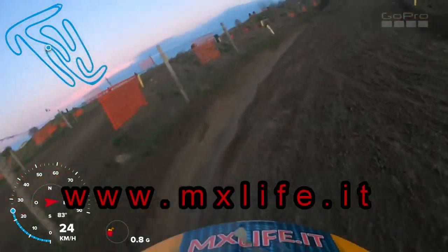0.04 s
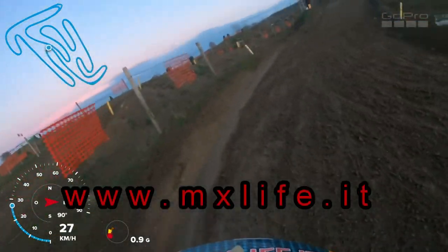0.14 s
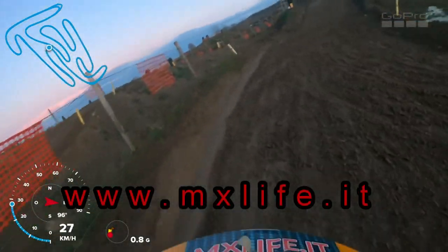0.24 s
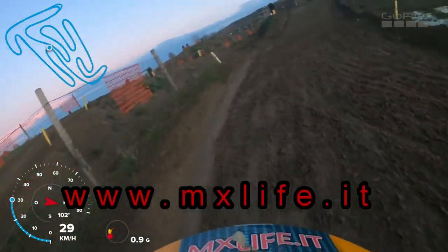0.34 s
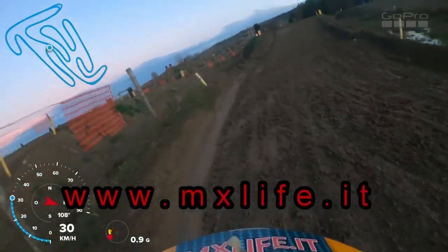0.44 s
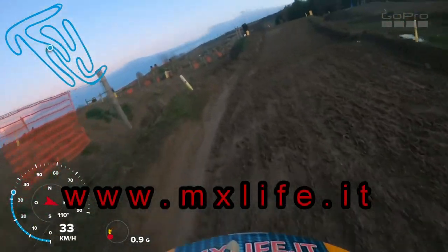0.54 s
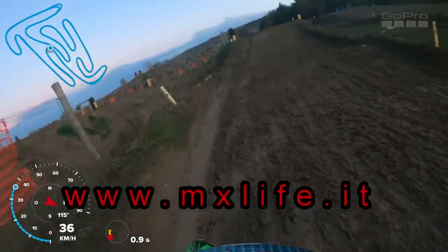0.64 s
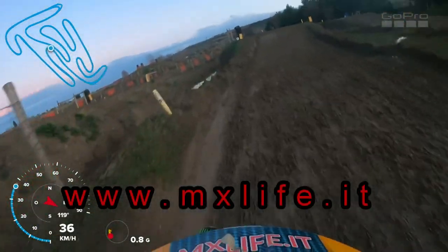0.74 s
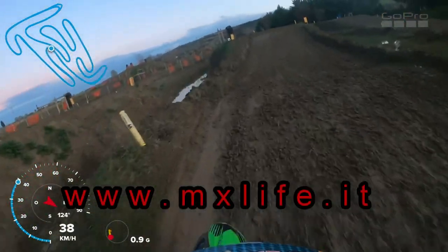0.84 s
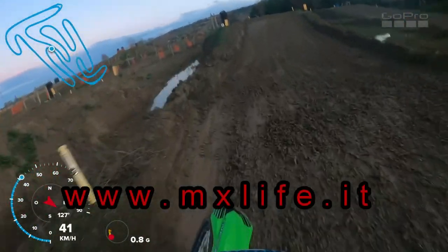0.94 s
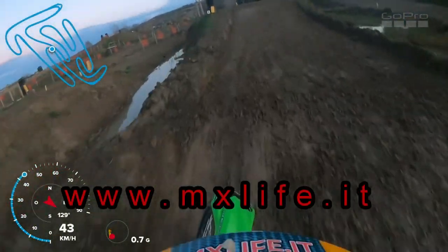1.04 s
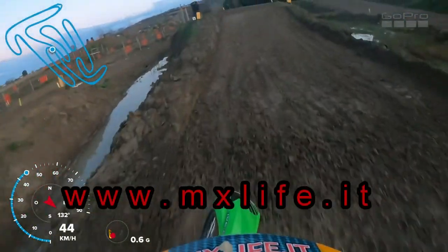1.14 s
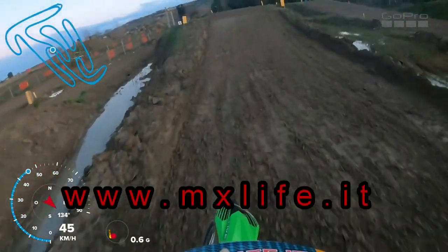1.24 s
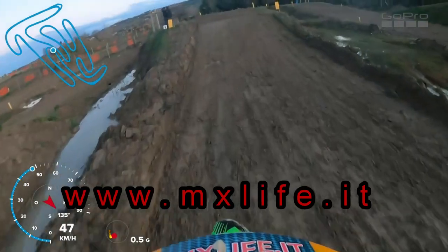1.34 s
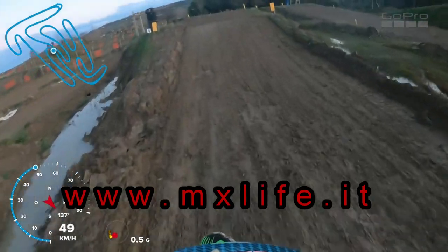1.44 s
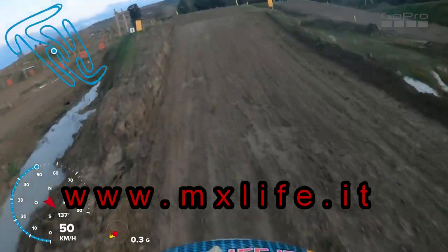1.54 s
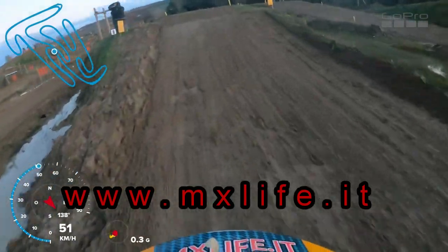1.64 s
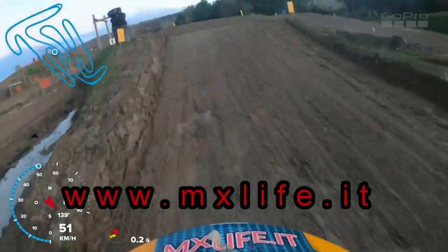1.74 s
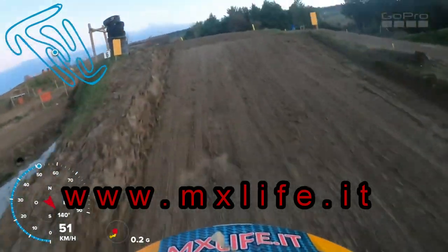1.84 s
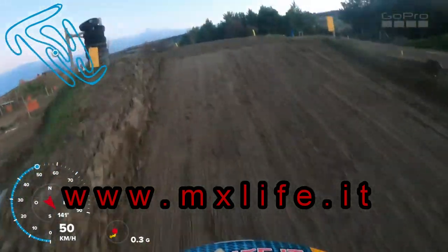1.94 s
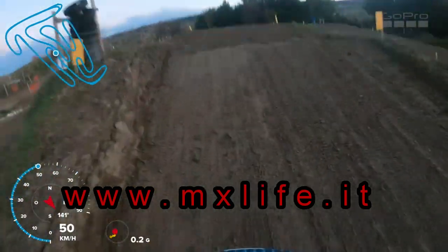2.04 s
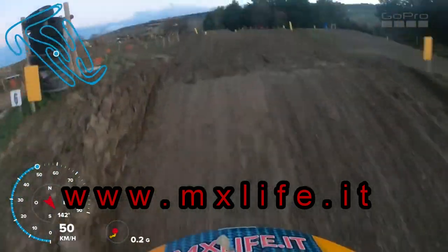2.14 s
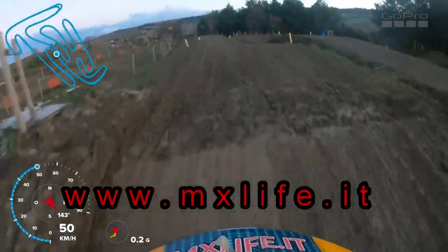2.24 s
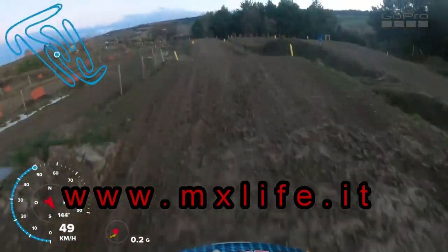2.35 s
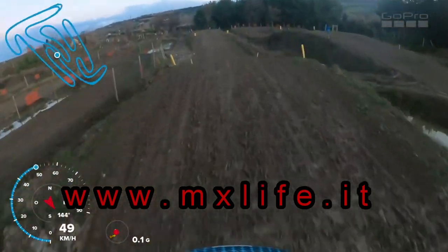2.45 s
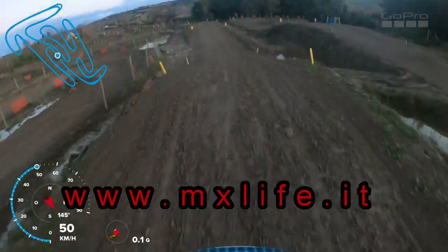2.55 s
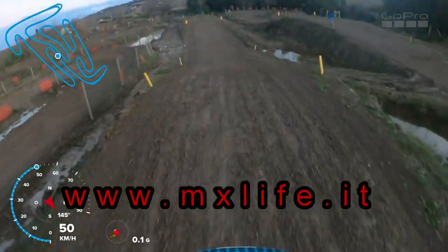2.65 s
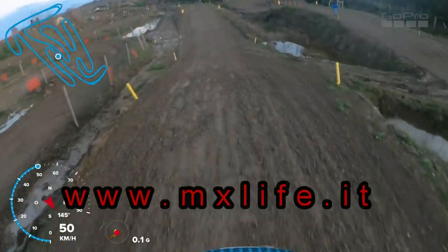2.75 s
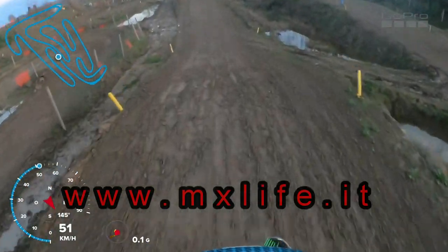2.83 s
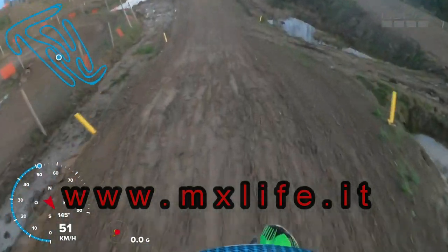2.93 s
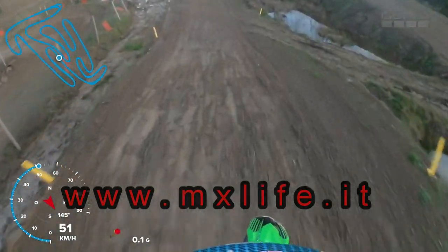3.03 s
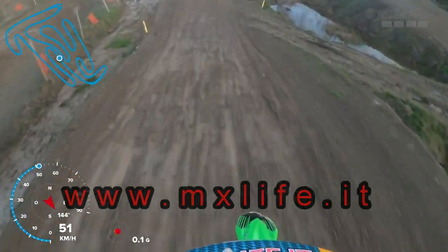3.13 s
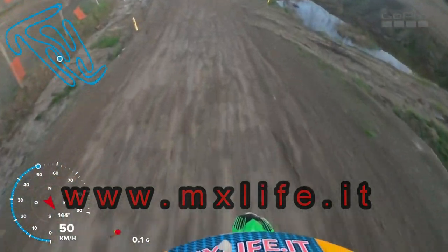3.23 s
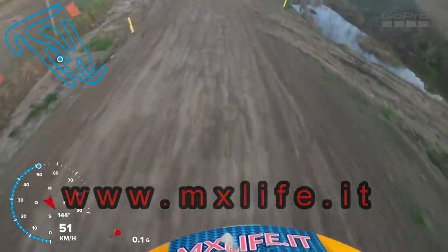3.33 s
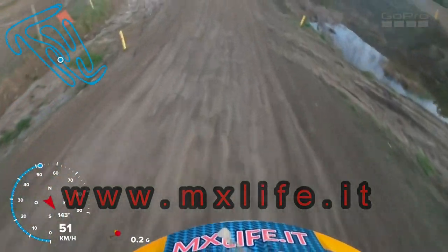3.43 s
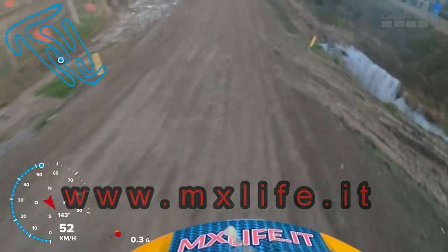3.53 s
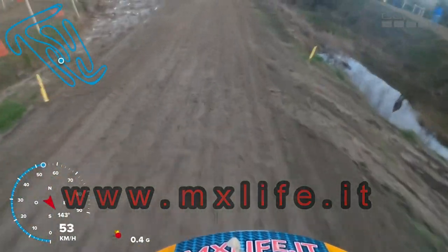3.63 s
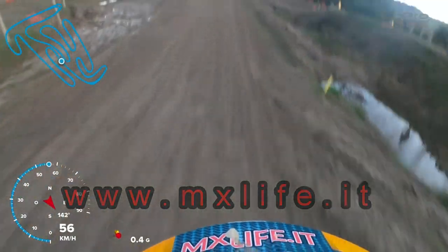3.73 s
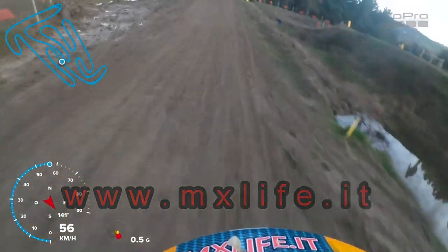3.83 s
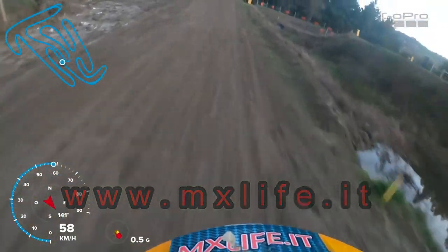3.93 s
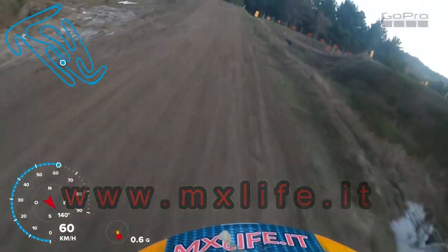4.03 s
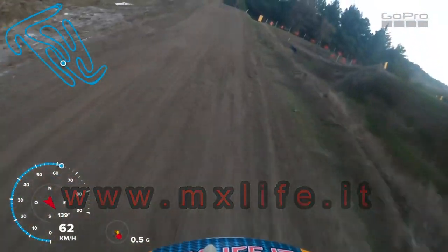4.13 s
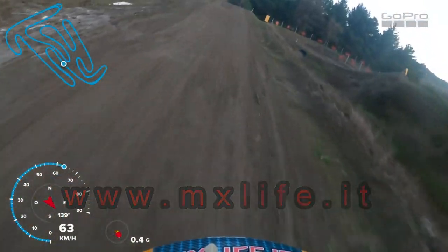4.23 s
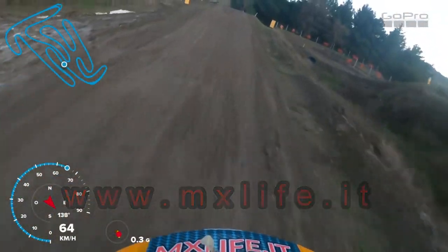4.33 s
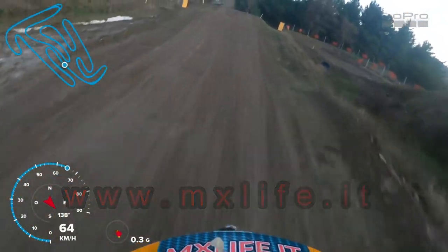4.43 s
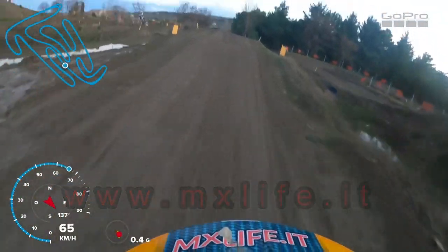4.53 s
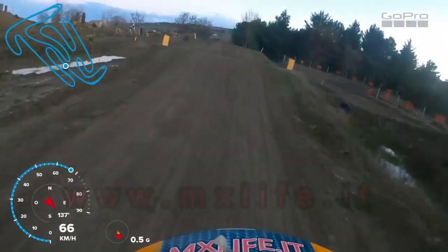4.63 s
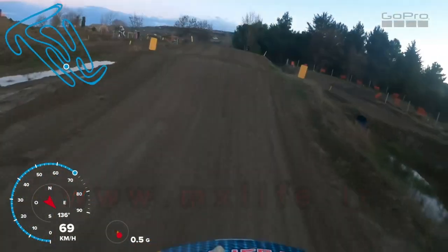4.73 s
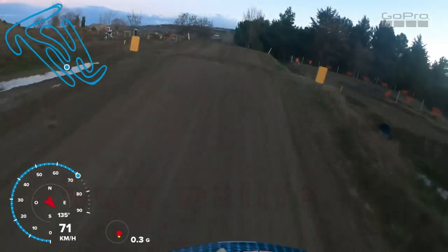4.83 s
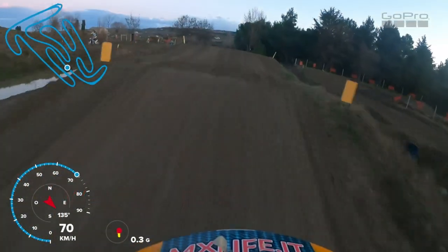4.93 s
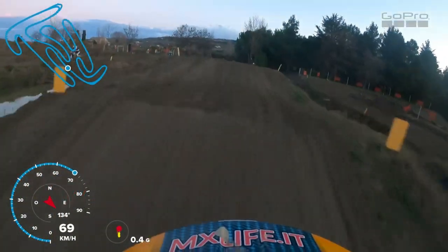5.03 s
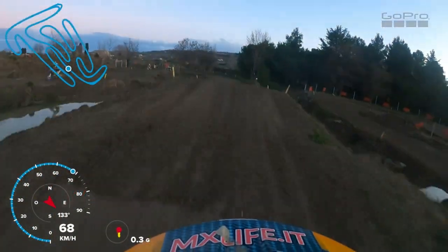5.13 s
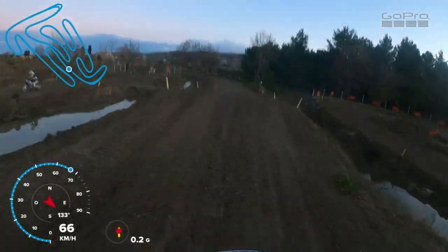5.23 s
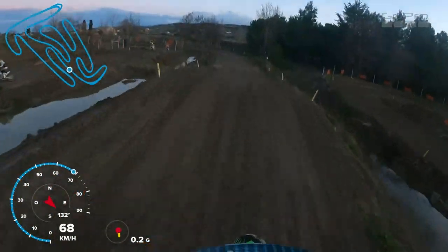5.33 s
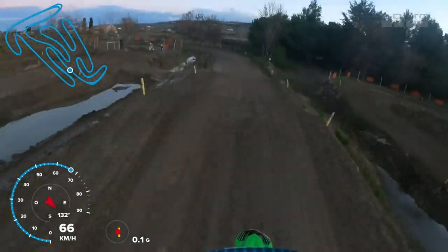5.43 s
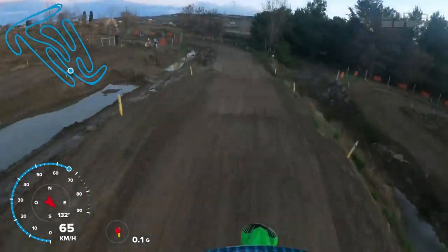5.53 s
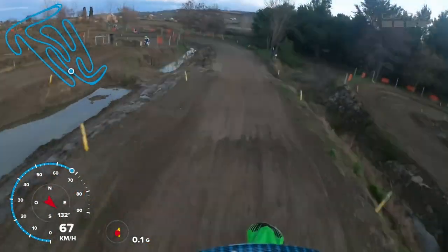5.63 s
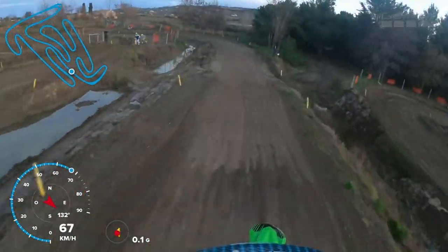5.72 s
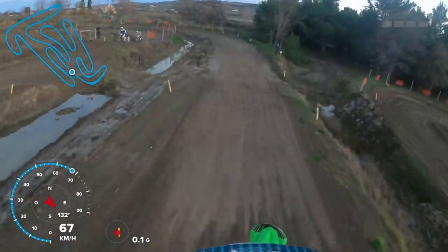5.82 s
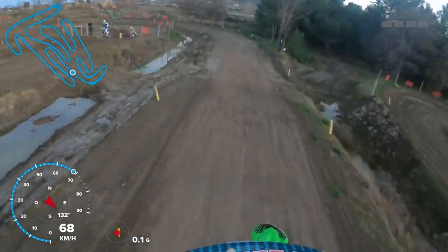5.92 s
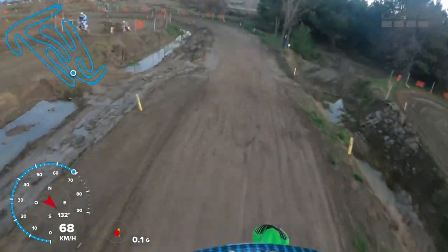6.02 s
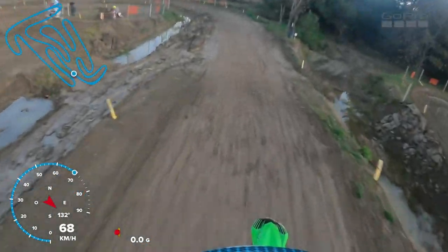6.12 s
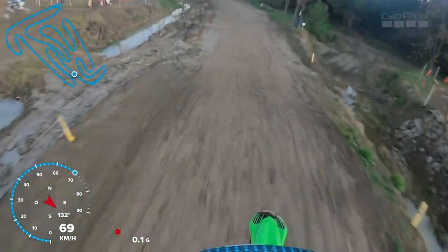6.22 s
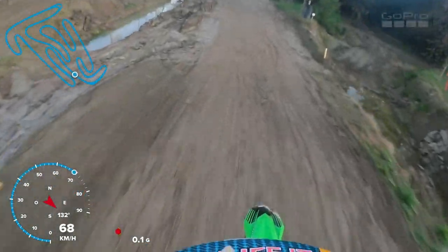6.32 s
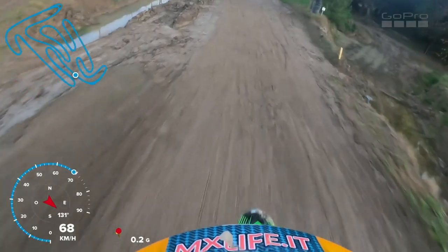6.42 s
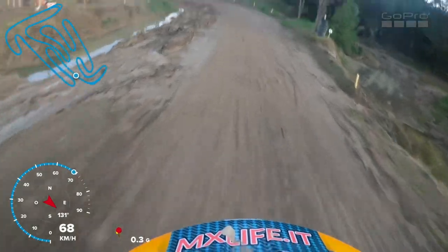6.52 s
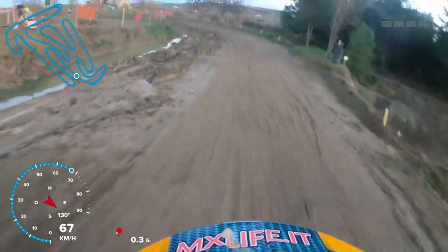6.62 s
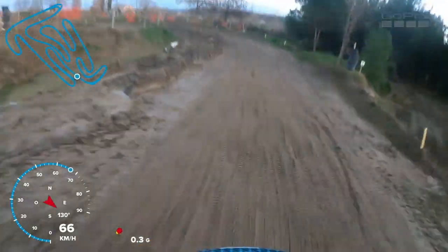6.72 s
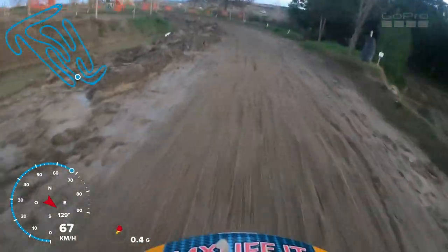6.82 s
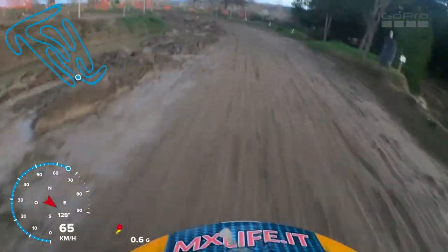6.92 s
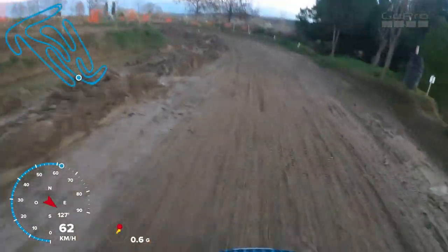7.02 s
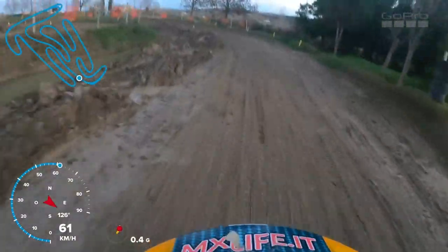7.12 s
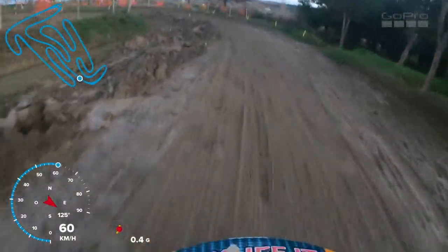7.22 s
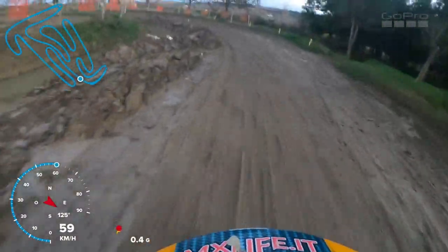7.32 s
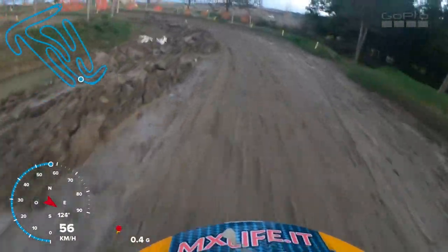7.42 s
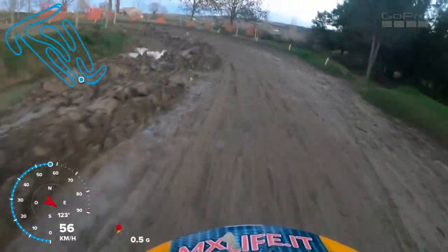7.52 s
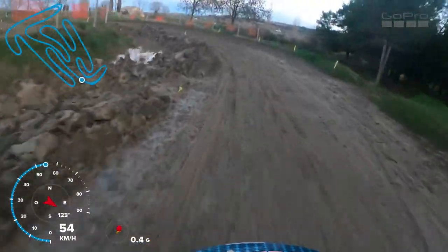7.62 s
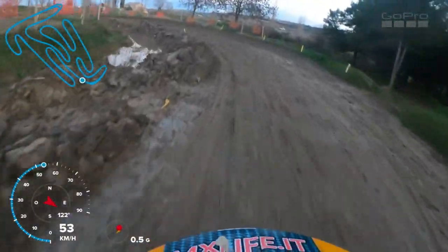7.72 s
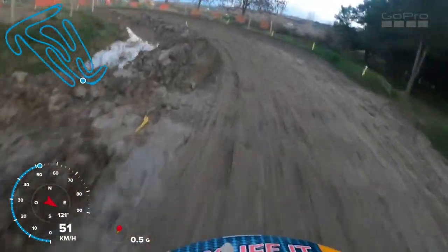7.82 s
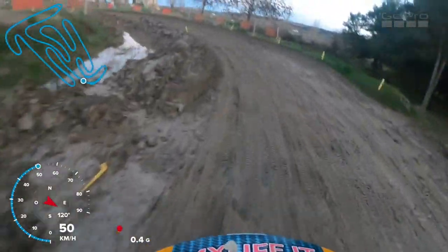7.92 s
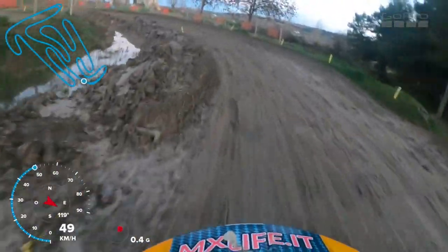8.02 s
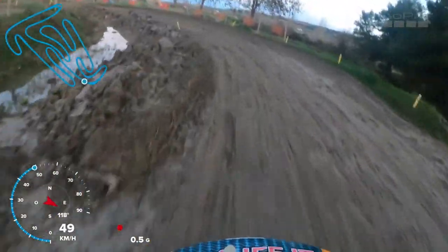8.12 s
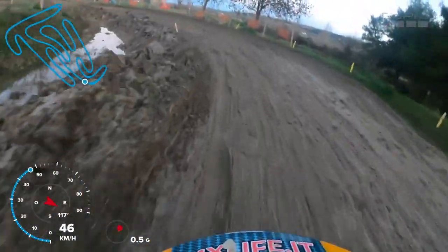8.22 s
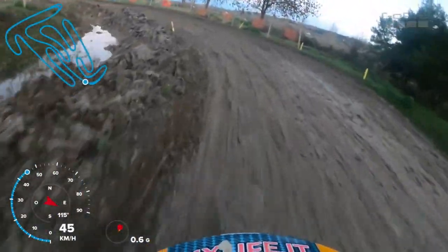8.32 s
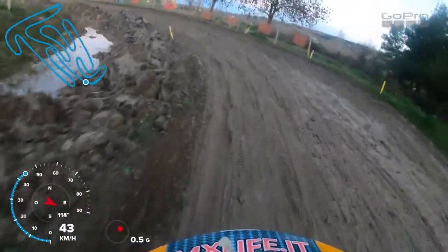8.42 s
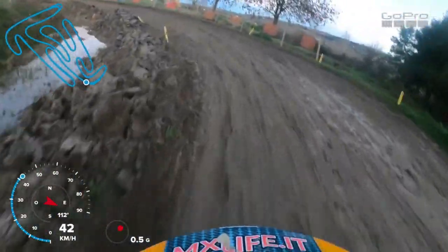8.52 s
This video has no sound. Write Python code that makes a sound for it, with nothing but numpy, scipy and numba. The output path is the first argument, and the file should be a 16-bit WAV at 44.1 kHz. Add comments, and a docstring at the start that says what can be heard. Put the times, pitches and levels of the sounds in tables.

```python
"""A single-cylinder four-stroke motocross bike on a dirt track, heard from inside the rider's helmet.
It pulls out of a corner, takes two jumps with a blip of the throttle in the air, then coasts lumpily into a bend.
Each engine cycle sends out pulses that ring the airbox, thud in the silencer and crack from the exhaust.
Clicks timed to the engine also shake the gears; filtered noise makes the chain and tyre rush, wind and hum.
Flying grit ticks on the helmet, and one jolt shakes it."""
import sys
import numpy as np
from scipy import signal
from scipy.fft import rfft, irfft
from scipy.io import wavfile
from scipy.ndimage import uniform_filter1d
from numba import njit

SR = 44100
rng = np.random.default_rng(int(sys.argv[2]) if len(sys.argv) > 2 else 0)


def bounce(signal):
    """Save signal as a 16-bit WAV file at the path given by the first command-line argument."""
    frames = np.transpose(np.atleast_2d(signal))
    limited = np.clip(frames, -1, 1)
    pcm = np.round(limited * 32767).astype(np.int16)
    wavfile.write(sys.argv[1], SR, pcm)


N = 377496  # length in samples


def undb(db):
    """Turn decibels into a gain to multiply by."""
    return 10 ** (np.asarray(db) / 20)


def together(*levels_db):
    """Level in dB of several unrelated sounds at once: their powers add."""
    return 20 * np.log10(np.sqrt(sum(undb(db) ** 2 for db in levels_db)))


def curves(table):
    """Join the points of each column by straight lines in time."""
    t, *columns = np.transpose(table)
    return [np.interp(np.arange(N) / SR, t, column) for column in columns]


def noise():
    """White noise: all pitches at once."""
    return rng.standard_normal(N)


def walk(rate):
    """Random wander: straight lines between random values, `rate` values a second."""
    knots = rng.standard_normal(2048)
    return np.interp(np.arange(N) / SR * rate, np.arange(len(knots)), knots)


def steady(x, size=3500):
    """Even out the level to 1 over a few engine cycles, leaving the single beats as they are."""
    power = uniform_filter1d(uniform_filter1d(x * x, size), size)
    return x / np.sqrt(np.maximum(power, 1e-14))


def colour(x, points, size=8192):
    """Filter to an outline of (f/Hz, level/dB) that acts only after each pulse, as a real body rings."""
    f, db = np.transpose(points)
    bins_hz = np.maximum(np.fft.rfftfreq(size, 1 / SR), 1)
    outline_db = np.interp(np.log(bins_hz), np.log(f), db)
    # folding the cepstrum forward in time gives the minimum-phase filter
    cepstrum = irfft(np.log(undb(outline_db)))
    cepstrum[1:size // 2] *= 2
    cepstrum[size // 2 + 1:] = 0
    response = irfft(np.exp(rfft(cepstrum)))
    return signal.oaconvolve(x, response)[:N]


def resonance(x, hz, width_hz):
    """Ring at one fixed pitch; a narrower width rings longer."""
    return signal.lfilter(*signal.iirpeak(hz, hz / width_hz, fs=SR), x)


@njit
def sweep(x, hz, width_hz):
    """Ring at a pitch that moves: a state-variable band-pass filter, one sample at a time."""
    y, band, low = np.empty(len(x)), 0., 0.
    for i in range(len(x)):
        g = np.tan(np.pi * hz[i] / SR)
        k = width_hz[i] / hz[i]
        v = (band + g * (x[i] - low)) / (1 + g * (g + k))
        band = 2 * v - band
        low = low + 2 * g * v
        y[i] = k * v
    return y


def clicks(times, sizes):
    """Put one click at each time, shared between the two nearest samples."""
    at = np.clip(times * SR, 0, N - 2)
    sizes = sizes * (at < N - 2)  # drop clicks past the end
    i = at.astype(int)
    return np.bincount(i, sizes * (1 - at + i), N) + np.bincount(i + 1, sizes * (at - i), N)


def puffs(kicks, decay_s):
    """Each kick starts a burst of noise that dies away, like turbulent gas."""
    envelope = signal.lfilter([1], [1, -np.exp(-1 / (decay_s * SR))], kicks)
    return envelope * noise()


# rush level at which the helmet's boom and whistle have their stated levels
SINGING_RUSH_DB = -55
# colour of the wind: f/Hz, relative level/dB
WIND_COLOUR = [(12, -15.5), (30, -12.5), (60, -13), (120, -19), (300, -21.5), (900, -50), (3000, -100)]


def wind(rush_db, rumble_db=15.0, boom_db=-41.0, boom_growth=1.0):
    """Eddies of air buffet the microphone as a low rumble and make the helmet's shell boom at 77 Hz."""
    buffet_db = 3.8
    rumble = steady(colour(noise(), WIND_COLOUR))
    rumble = rumble * undb(rush_db + rumble_db + buffet_db * walk(rate=22))
    shell = resonance(resonance(noise(), hz=77.0, width_hz=22), hz=77.0, width_hz=22)
    return rumble + steady(shell) * undb(boom_db + boom_growth * (rush_db - SINGING_RUSH_DB))


# colour of a gust: f/Hz, relative level/dB
GUST_COLOUR = [(12, -12.5), (35, 0.5), (70, -16), (130, -14.5), (400, -34.5), (1500, -70.5), (6000, -130)]
# gusts on bumps, landings and braking: middle t/s, half length t/s, rumble level/dB
GUST_EVENTS = [(0.174, 0.093, -40), (0.696, 0.054, -36.5), (0.84, 0.029, -37), (1.969, 0.078, -32.5),
               (2.11, 0.03, -36), (2.407, .035, -40), (3.723, 0.077, -35), (4.253, 0.036, -35),
               (4.869, 0.062, -36), (6.585, 0.031, -40), (6.73, 0.05, -27), (6.931, 0.039, -46),
               (7.107, 0.058, -39), (7.848, 0.028, -35), (8.248, 0.22, -40)]


def gusts(t):
    """Short, deep gusts over the helmet: low noise swelling and fading in a bell curve."""
    swell = sum(undb(db) * np.exp(-.5 * ((t - s) / half_s) ** 2) for s, half_s, db in GUST_EVENTS)
    return steady(colour(noise(), GUST_COLOUR), size=2000) * swell


# the helmet's hum, before it wavers: t/s, level/dB
HUM_LEVEL = [(0, -57), (1.65, -52.5), (1.95, -46), (2.4, -56.5), (3.0, -58.5), (3.9, -48), (4.9, -42),
             (5.5, -52), (5.85, -50.5), (6.0, -42), (6.45, -42.5), (6.8, -50.5), (7.4, -49), (8.56, -54.5)]


def hum(hz=627.5, width_hz=37.0, drift=0.028, waver_db=2.5):
    """Air blows across a small cavity of the helmet, which picks one wavering note out of the noise."""
    level_db, = curves(HUM_LEVEL)
    centre_hz = hz * (1 + drift * walk(rate=9))
    width = np.full(N, 1. * width_hz)
    note = sweep(sweep(noise(), centre_hz, width), centre_hz, width)
    return steady(note) * undb(level_db + waver_db * walk(rate=18))


def whistle(rush_db, level_db=-58, growth=1.58):
    """Fast air sizzles at an edge of the helmet, with fine hiss above; it grows faster than the rush."""
    waver_db, spray_db = .7, -18.0
    edge = resonance(resonance(noise(), hz=5270, width_hz=820), hz=5270, width_hz=820)
    spray = undb(spray_db) * steady(resonance(noise(), hz=8000, width_hz=1700))
    whistle_db = level_db + growth * (rush_db - SINGING_RUSH_DB)
    return (steady(edge) + spray) * undb(whistle_db + waver_db * walk(rate=9.9))


def jolt(t, at_s=1.952, envelope_db=-22, hz=22.0, half_s=0.044):
    """The bike slams through a dip and the helmet swings slowly a few times against the microphone."""
    since = t - at_s
    envelope = undb(envelope_db) * np.exp(-.5 * (since / half_s) ** 2)
    return envelope * np.sin(2 * np.pi * hz * since)


# grit hitting the helmet: t/s, click level/dB before the trim
GRIT_HITS = [(0.8246, -57), (1.1542, -69), (1.1863, -60), (1.8243, -67), (5.0283, -57), (5.112, -65)]


def grit(trim_db=2.0):
    """Flying dirt ticks on the helmet: single clicks through a wide, bright resonance."""
    s, db = np.transpose(GRIT_HITS)
    return resonance(clicks(s, undb(db + trim_db)), hz=10000, width_hz=9000)


# engine speed while the rear wheel grips: t/s, firing rate f/Hz
IN_GEAR_REVS = [(0, 40.05), (.11, 46.22), (.2, 48.45), (.5, 50.8), (.95, 58.47), (1.02, 64.75),
                (1.45, 67.2), (1.63, 61.92), (1.86, 68.84), (1.9, 64.1), (1.95, 72.67), (2.02, 70.7),
                (2.5, 74.35), (3.55, 63.58), (3.63, 63.54), (3.98, 73.67), (4.5, 77.86), (4.92, 80.33),
                (5.0, 84.3), (5.26, 85.23), (6.6, 61.07), (6.95, 74.53), (7.22, 55.26), (7.42, 45.9),
                (7.59, 52.18), (8.0, 51.65), (8.3, 54.9), (8.56, 51.1)]
# the rear wheel spins up on loose dirt, then bites: peak t/s, extra firing rate f/Hz, spin-up t/s
WHEEL_SLIPS = [(0.419, 1.79, 0.067), (0.581, 6.7, 0.067), (0.734, 7.7, 0.09), (0.884, 6.9, 0.067),
               (1.375, 13.1, 0.092), (1.814, 24.5, 0.16), (2.08, 12, 0.054), (2.217, 19.7, 0.086),
               (3.69, 6.6, 0.083), (3.89, 2.74, 0.13), (4.09, 3.16, 0.1043), (4.271, 2.13, 0.061),
               (4.605, 10.3, 0.11), (6.68, 3.3, 0.052), (7.26, 4.86, 0.04), (7.36, 3.2, 0.04)]
# jumps: take-off t/s, firing rate at take-off f/Hz, sag time constant t/s, blip start t/s,
# blip top t/s, firing rate at the top f/Hz, landing t/s
JUMP_EVENTS = [(2.55, 85.02, 1.34, 3.265, 3.475, 91.34, 3.461),
               (5.38, 90.2, 1.46, 6.16, 6.37, 82.58, 6.545)]
BITE_S = .07  # time the tyre takes to find its grip again, or to lose it at take-off


def revs(t):
    """Firing rate: tied to the ground, flaring with wheelspin; in the air it sags until the rider blips."""
    hz, = curves(IN_GEAR_REVS)
    for s, extra_hz, spin_s in WHEEL_SLIPS:
        hz = hz + extra_hz * np.interp(t, [s - spin_s, s, s + BITE_S], [0, 1, 0])
    for off_s, off_hz, sag_s, blip_s, top_s, top_hz, land_s in JUMP_EVENTS:
        sagging = off_hz * np.exp(-(np.clip(t, off_s, blip_s) - off_s) / sag_s)
        free = sagging + (top_hz - sagging) * np.interp(t, [blip_s, top_s], [0, 1])
        airborne = np.interp(t, [off_s - BITE_S, off_s, land_s, land_s + BITE_S], [0, 1, 1, 0])
        hz = hz + airborne * (free - hz)
    return hz


IDLE_HZ = 47.8  # firing rate from which the rise of the revs is counted


def overrun(hz):
    """Throttle shut, an uneven burble: returns the twist columns' settings from the honk on, without the swell."""
    burble_db = 3.0
    above_idle = np.maximum(hz - IDLE_HZ, 0)
    honk_db, thud_db, drone_db = (db + burble_db * walk(rate=29) for db in (-38.5, -48.5, -41.5))
    bark_db = -65.5 + 0.4333 * above_idle
    growl_db = -59.5 + 0.164 * above_idle
    rough = np.clip(0.65 - 0.011 * above_idle, .12, 1)
    pumping = .011 * above_idle
    airbox_hz, ring_hz = 280, 1460
    return honk_db, bark_db, thud_db, airbox_hz, rough, pumping, drone_db, growl_db, ring_hz


# twists of the throttle: half open t/s, half shut t/s, airbox honk level/dB, swell of the honk (dB per s),
# exhaust bark level/dB, silencer thud level/dB, airbox pitch f/Hz, roughness (0-1),
# pumping without firing (0-1), silencer drone level/dB, header growl level/dB, tailpipe ring f/Hz;
# bark and growl levels are before their trims
THROTTLE_TWISTS = [(-.03, 0.194, -21.5, -40, -44, -39, 270, 0.57, 0.45, -40, -47, 1173),
                   (0.179, 0.324, -21.5, -1, -41.5, -37.5, 289, 0.47, 0.46, -43, -52.5, 1300),
                   (0.35, 0.525, -30.5, 23, -46, -40, 276, 0.19, 0.86, -49, -50, 1335),
                   (0.512, 0.965, -24.5, 3, -37.5, -33, 295, 0.3, 0.14, -40, -48.5, 1550),
                   (0.945, 1.372, -22.5, 0, -38, -42, 285, 0.24, 0, -40.5, -45.5, 1530),
                   (1.684, 2.201, -26, 4, -38, -38.5, 305, 0.34, 0, -38.5, -44.5, 1400),
                   (2.261, 2.541, -29.5, 1, -43.5, -35.5, 304.8, 0.26, 0, -47, -48.5, 1310),
                   (2.848, 3.293, -33, -5.5, -70, -39.5, 284, 0.34, 0.3, -42.5, -59, 1395),
                   (3.298, 3.471, -27, 16, -35.5, -39, 272, 0.22, 0.52, -33.5, -44.5, 1454),
                   (3.524, 4.529, -22.5, -4.5, -41, -43.5, 276.9, 0.19, .14, -39.5, -47.5, 1446),
                   (4.521, 4.659, -27.5, -21, -38.5, -39, 271.3, 0.05, 0.19, -35, -54, 1370),
                   (4.658, 4.943, -29, 4, -39.5, -46, 279, 0.25, 0.26, -42.5, -51.5, 1418),
                   (4.938, 5.193, -19.5, -3.5, -37.5, -35, 307.7, 0.1, 0.07, -46, -41.5, 1547),
                   (5.18, 5.349, -23.5, -41, -41, -36, 333, 0.28, 0.46, -58, -50.5, 1509),
                   (6.181, 6.549, -27.5, -24, -44, -38.5, 280.8, 0.3, 0.51, -42, -52.5, 1516),
                   (6.535, 7.048, -30, 1.5, -53, -44, 275.4, 0.34, 0, -43, -53, 1505),
                   (7.049, 7.376, -29, -19, -71, -38.5, 238, 0.51, 0, -37, -62, 1448),
                   (7.544, 8.598, -32, 1, -71, -42, 238, 0.37, 0, -36.5, -56.5, 1410)]
OPEN_S, SHUT_S = 0.088, 0.049  # time the wrist takes to open and to shut the throttle


def throttle(t, hz):
    """Each twist opens, holds and shuts, blending the engine from overrun to its own settings and back."""
    closed = overrun(hz)
    held, pulling = 0, np.zeros((len(closed), N))
    for open_s, shut_s, honk_db, swell, *running in THROTTLE_TWISTS:
        opening, shutting = (t - open_s) / OPEN_S, (shut_s - t) / SHUT_S
        grip = np.clip(np.minimum(opening, shutting) + .5, 0, 1)
        on = grip > 0
        swelling_honk_db = honk_db + swell * (t[on] - open_s)
        for total, value in zip(pulling, [swelling_honk_db, *running]):
            total[on] += grip[on] * value
        held = held + grip
    # where two twists overlap, take their weighted average
    return [(pull + np.maximum(1 - held, 0) * shut) / np.maximum(held, 1)
            for pull, shut in zip(pulling, closed)]


def firings(hz, rough, jitter_s=0.0014, scatter_db=2.0):
    """Time, length and strength of each engine cycle; a rough engine fires unevenly."""
    phase = np.cumsum(hz) / SR  # cycles turned so far
    i = np.searchsorted(phase, np.arange(int(phase[-1]) + 1))
    chance = rng.standard_normal((len(i), 2))
    times = i / SR + jitter_s * rough[i] ** 2 * chance[:, 0]
    sizes = undb(scatter_db * rough[i] * chance[:, 1])
    return times, 1 / hz[i], sizes


def gulps(times, periods, sizes, pumping):
    """One push of gas a cycle, plus a pumped one half a cycle later, on the turn that does not fire."""
    return clicks(times, sizes) + pumping * clicks(times + periods / 2, sizes)


# exhaust crack and the knocks after it: delay (share of the cycle), relative level/dB
CYCLE_STROKES = [(0, 0), (.27, -9), (.54, -14)]


def strokes(times, periods, sizes):
    """Sharp kicks locked to the crank, each a tiny bit early or late."""
    lag_s, jitter_s = .002, .00004
    chance = rng.standard_normal((len(times), len(CYCLE_STROKES)))
    share, db = np.transpose(CYCLE_STROKES)
    when = times[:, None] + lag_s + periods[:, None] * share + jitter_s * chance
    strength = np.sqrt(sizes)[:, None] * undb(db)
    return clicks(when.ravel(), strength.ravel())


# cycles whose extra level is set instead of random: t/s, extra level/dB
SET_FIRINGS = [(.024, 4.5), (.16, -3), (.223, 0), (.365, 6), (.386, 2), (.575, 5), (3.342, 0), (3.79, 4)]


def bangs(times, periods):
    """Extra level of each cycle's crack: no two burns are alike, and some go off hard."""
    scatter_db = .7
    db = scatter_db * rng.standard_normal(len(times))
    for s, extra_db in SET_FIRINGS:
        db[np.argmin(abs(times - s))] = extra_db
    return np.interp(np.arange(N) / SR, times + periods / 4, db)


# colour of rattle and rush: f/Hz, relative level/dB
RATTLE_COLOUR = [(300, 16), (700, 10.5), (950, 7), (1600, 16.5), (2050, 9.5), (2350, 4.5), (2850, -7),
                 (3700, -3), (4500, -12), (5350, -12.5), (6700, -20), (8500, -29), (11000, -47.5),
                 (15000, -40)]


def rattle(kicks, rush_db, clatter_db, flicker_db=3.5, trim_db=15.0):
    """Valve gear clatters in short bursts with the crank, over the rush of chain, tyres and air."""
    clatter = steady(puffs(kicks, decay_s=.004)) * undb(clatter_db)
    rush = steady(noise() * undb(flicker_db * walk(rate=18))) * undb(rush_db)
    level_db = together(rush_db, clatter_db) + trim_db
    return steady(colour(clatter + rush, RATTLE_COLOUR)) * undb(level_db)


def valves(kicks, hz, idle_db=-62.5, rise_db=0.2866):
    """The valve gear rings on one note after each kick, louder with the revs (rise in dB per Hz)."""
    ring = puffs(kicks, decay_s=0.025)
    for _ in range(2):
        ring = resonance(ring, hz=2303, width_hz=210)
    return steady(ring) * undb(idle_db + rise_db * (hz - IDLE_HZ))


# resonances of the cylinder head: f/Hz, width f/Hz, relative level/dB
HEAD_RESONANCES = [(1200, 260, 6), (2290, 420, 1), (3766, 220, -5), (5300, 1200, -17.5)]


def knock(kicks, bark_db, hz, lag_s=0.0045, lugging_hz=49.1, fade_db=0.6, trim_db=-2.0, tick_db=-16.0):
    """Lugging at low revs, the cylinder head ticks and clinks just after each bang; higher revs fade it."""
    uneven_db = 3.0
    blows = np.roll(kicks * undb(uneven_db * walk(rate=76)), int(lag_s * SR))
    taps = puffs(blows, decay_s=0.0022)
    metal = sum(undb(db) * resonance(resonance(taps, f, width), f, width)
                for f, width, db in HEAD_RESONANCES)
    tick = resonance(resonance(blows, hz=2900, width_hz=2400), hz=2900, width_hz=2400)
    level_db = bark_db + trim_db - fade_db * np.maximum(hz - lugging_hz, 0)
    return (steady(metal) + undb(tick_db) * steady(tick)) * undb(level_db)


# colour of the airbox: f/Hz, relative level/dB
AIRBOX_COLOUR = [(70, -9.5), (165, -20), (205, 5), (245, 15.5), (305, 10), (340, -1), (385, -8),
                 (440, -30.5), (560, -9.5), (700, -19.5), (900, -42), (2000, -50)]


def intake(pushes, airbox_hz, width_hz, honk_db, rough, breath=0.54, steepening=0.39):
    """Each gulp rings the airbox; loud swings steepen (squaring) and add overtones an octave up."""
    turbulence = steady(colour(puffs(pushes, decay_s=0.04), AIRBOX_COLOUR))
    gulping = steady(colour(pushes, AIRBOX_COLOUR)) + breath * rough * turbulence
    honk = steady(sweep(gulping, airbox_hz, width_hz)) * undb(honk_db)
    return honk + steepening * resonance(honk ** 2, hz=680, width_hz=340)


# colours of the silencer's thud and of its higher drone: f/Hz, relative level/dB
THUD_COLOUR = [(35, -40), (55, -16.5), (76, 8.5), (96, -5), (125, -7.5), (300, -83.5), (2000, -110)]
DRONE_COLOUR = [(70, -31.5), (105, -6), (120, -2.5), (155, 2.5), (180, 3.5), (230, -11.5), (400, -66),
                (2000, -110)]


def thud(pushes, points, level_db, rough, flutter=0.97):
    """A low note of gas from the silencer, fluttering with noise when the engine runs rough."""
    fluttering = steady(colour(puffs(pushes, decay_s=0.019), points))
    low = steady(colour(pushes, points)) + flutter * rough * fluttering
    return steady(low) * undb(level_db)


# colour of the header pipe: f/Hz, relative level/dB
HEADER_COLOUR = [(320, -37), (390, 8), (435, 9), (475, 2), (520, 5), (640, -0.5), (730, 2), (850, -3),
                 (1400, -48)]
# the pipe's strongest resonance, high with hot gas and low on the overrun: t/s, f/Hz
PIPE_NOTE_PITCH = [(.45, 644), (.8, 708), (1.25, 688), (1.45, 498), (1.72, 629.3), (2.12, 611.9),
                   (2.4, 497.8), (2.8, 467), (3.7, 515.7), (4.15, 556.6), (5.05, 511.5), (8.56, 449.8)]


def growl(hz, rough, growl_db, evenness=0.17, note_width_hz=37.0):
    """The header pipe sings overtones that glide with the revs and swell on crossing its resonance."""
    calm, note_gain, lift_db = .6, 3.0, 3.0
    note_hz, = curves(PIPE_NOTE_PITCH)
    pulses = gulps(*firings(hz, calm * rough), np.full(N, evenness))
    overtones = colour(pulses, HEADER_COLOUR)
    note = sweep(overtones, note_hz, np.full(N, 1. * note_width_hz))
    return steady(overtones + note_gain * note) * undb(growl_db + lift_db)


# colour of the exhaust: f/Hz, relative level/dB
EXHAUST_COLOUR = [(300, -28), (520, -31.5), (750, -6.5), (930, -2), (1150, -2.5), (1350, -1), (1540, -3),
                  (1800, -11), (2100, -14), (2450, -8), (2800, -29.5), (3800, -15.5), (6000, -38.5),
                  (12000, -76.5)]


def bark(kicks, bark_db, rough, pumping, ring_hz, chirp_s=0.0066, ring_gain=1.8, ring_width_hz=260.0, trim_db=-0.24):
    """The pipe smears each pressure front into a rising chirp, gas rasps along, and the tailpipe rings."""
    t = np.arange(int(chirp_s * SR)) / SR
    burst = signal.windows.tukey(len(t))
    chirp = burst * signal.chirp(t, 850, t[-1], 3000)
    crack = colour(signal.oaconvolve(kicks, chirp)[:N], EXHAUST_COLOUR)
    rasp = steady(signal.oaconvolve(kicks, burst ** 2)[:N] * noise())
    # roughness brings gas in pulses, pumping brings an even flow
    pulsed, even = .5 + 1.5 * rough, 1.6 * pumping
    gas_db = -7.5
    gas = colour(pulsed * rasp + even * noise(), EXHAUST_COLOUR)
    blast = steady(crack) + undb(gas_db) * np.hypot(pulsed, even) * steady(gas)
    shift = .035  # the ring's pitch wanders by this share
    wandering_hz = ring_hz * (1 + shift * walk(rate=21))
    ring = sweep(blast, wandering_hz, np.full(N, 1. * ring_width_hz))
    return steady(blast + ring_gain * ring) * undb(bark_db + trim_db)


# rush of air, chain and tyres, the base level that rattle and wind build on: t/s, level/dB
RUSH_LEVEL = [(0, -58.5), (1.55, -63), (1.9, -55), (2.6, -63.5), (3.2, -60.5), (3.9, -55), (4.45, -55.5),
              (4.75, -52.5), (5.25, -53.5), (5.45, -59), (6.0, -54), (6.45, -53), (7.1, -55.5),
              (7.28, -54.5), (7.56, -58), (8.56, -61.5)]
# the airbox rings longer at first, then shorter as its resonance widens: t/s, width f/Hz
AIRBOX_DAMPING = [(0, 35.4), (.48, 35.9), (.56, 88.2), (8.56, 82.7)]


def scene():
    """Ride the throttle, fire the engine, and add up air, grit, metal, intake and exhaust at the helmet."""
    t = np.arange(N) / SR
    hz = revs(t)
    rush_db, = curves(RUSH_LEVEL)
    width_hz, = curves(AIRBOX_DAMPING)
    honk_db, bark_db, thud_db, airbox_hz, rough, pumping, drone_db, growl_db, ring_hz = throttle(t, hz)

    times, periods, sizes = firings(hz, rough)
    pushes = gulps(times, periods, sizes, pumping)
    kicks = strokes(times, periods, sizes)
    crack_db = bark_db + bangs(times, periods)
    clatter_db = bark_db - 20

    air = wind(rush_db) + gusts(t) + hum() + whistle(rush_db) + jolt(t)
    metal = rattle(kicks, rush_db, clatter_db) + valves(kicks, hz) + knock(kicks, crack_db, hz)
    airbox = intake(pushes, airbox_hz, width_hz, honk_db, rough)
    silencer = thud(pushes, THUD_COLOUR, thud_db, rough) + thud(pushes, DRONE_COLOUR, drone_db, rough)
    exhaust = silencer + growl(hz, rough, growl_db) + bark(kicks, crack_db, rough, pumping, ring_hz)
    return (air + grit() + metal + airbox + exhaust)[None]


def record(dry):
    """The microphone port rings faintly near 12 kHz; the ends are faded and the top is cut."""
    top_hz = 15700
    ported = dry + 1.3 * resonance(dry, hz=12100, width_hz=650)
    ends = signal.windows.tukey(N, .001)
    low_pass = signal.ellip(8, .2, 70, top_hz, fs=SR, output="sos")
    return signal.sosfilt(low_pass, ported * ends)


dry = scene()
out = record(dry)
bounce(out)
```